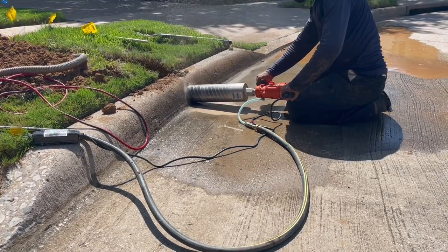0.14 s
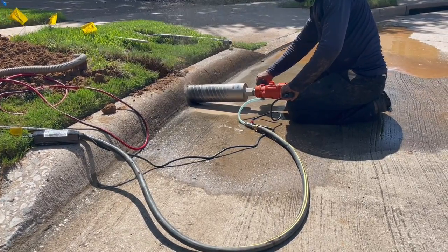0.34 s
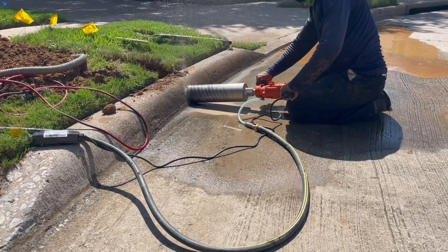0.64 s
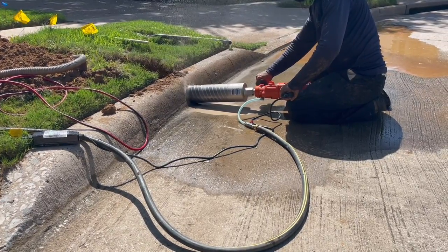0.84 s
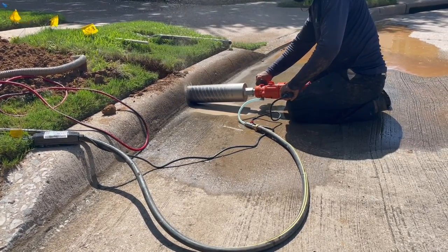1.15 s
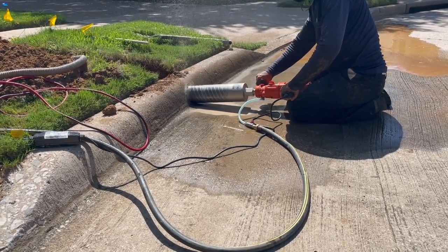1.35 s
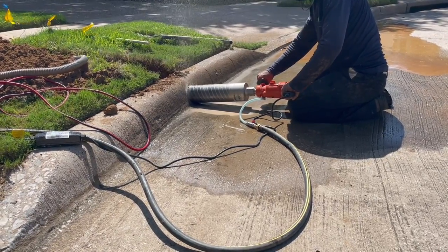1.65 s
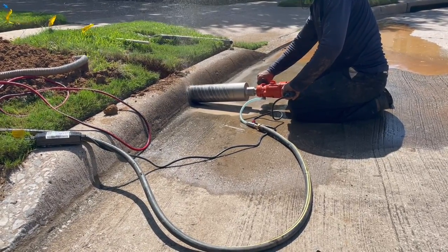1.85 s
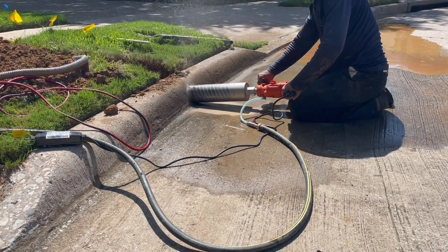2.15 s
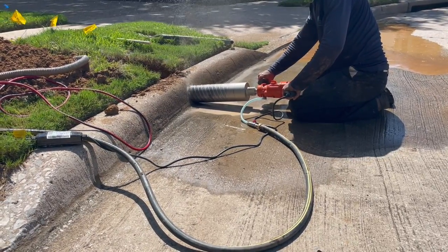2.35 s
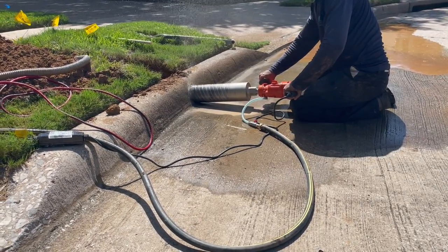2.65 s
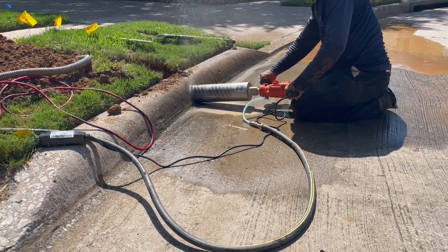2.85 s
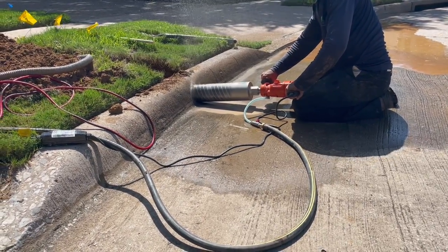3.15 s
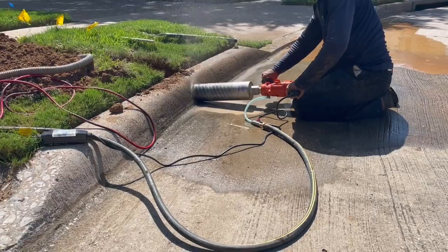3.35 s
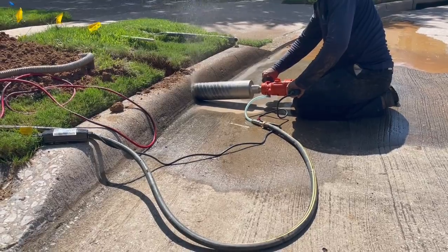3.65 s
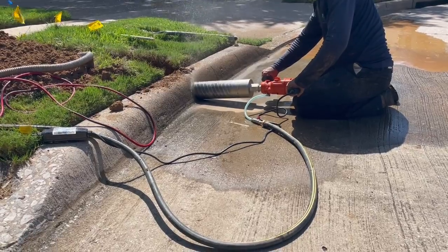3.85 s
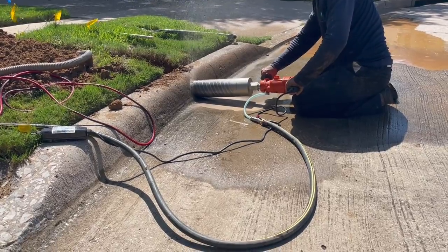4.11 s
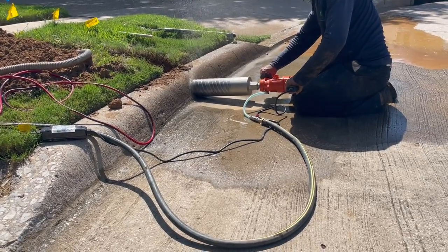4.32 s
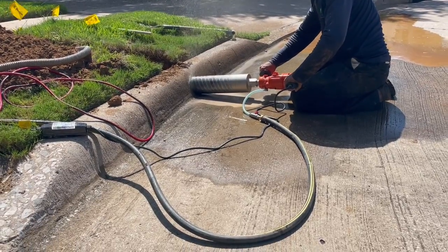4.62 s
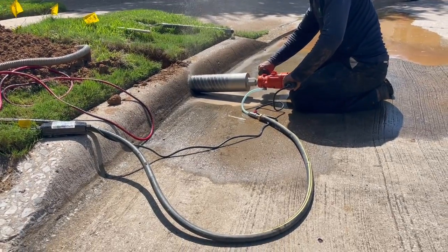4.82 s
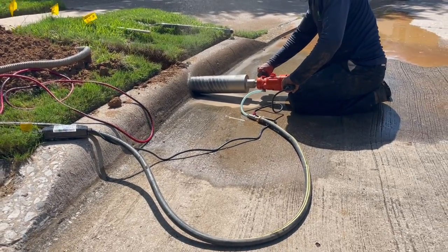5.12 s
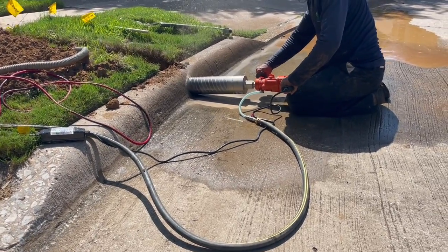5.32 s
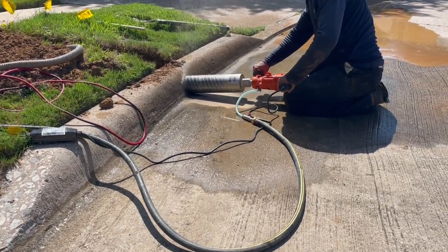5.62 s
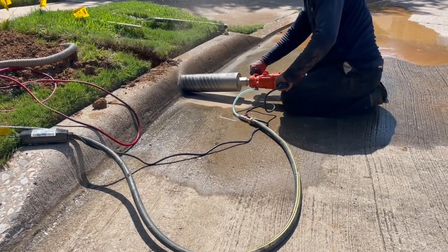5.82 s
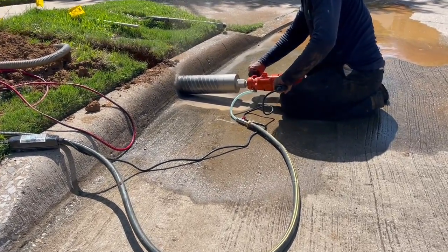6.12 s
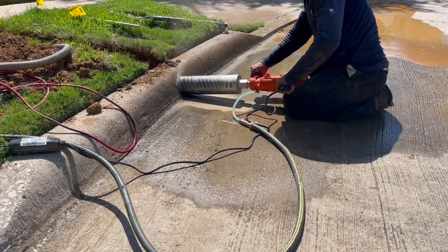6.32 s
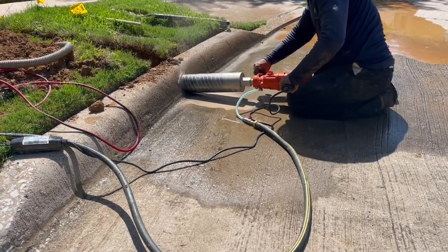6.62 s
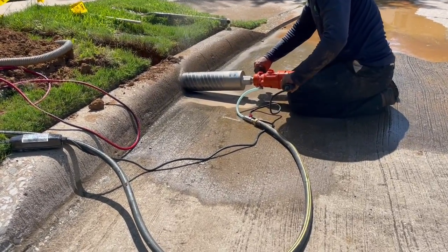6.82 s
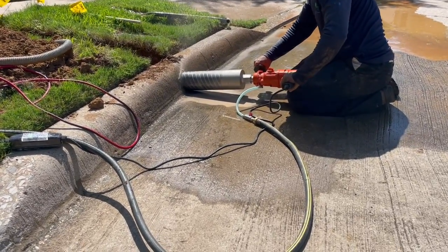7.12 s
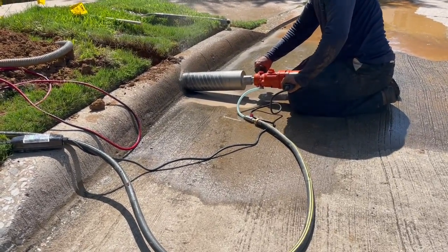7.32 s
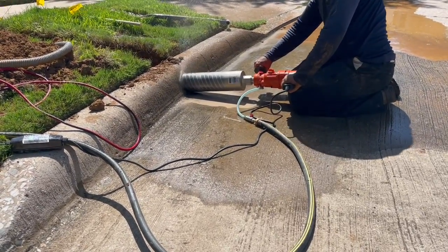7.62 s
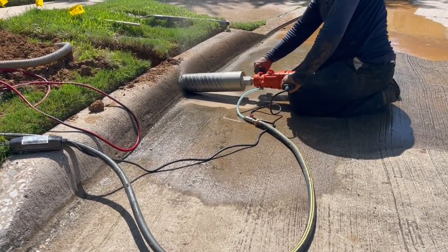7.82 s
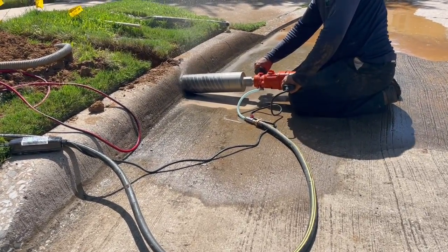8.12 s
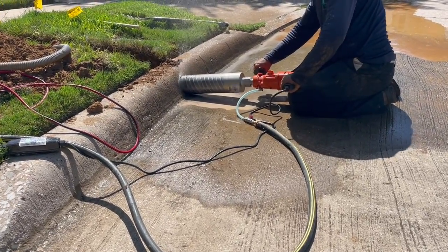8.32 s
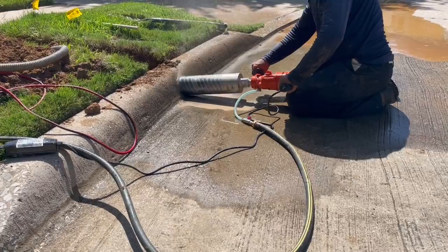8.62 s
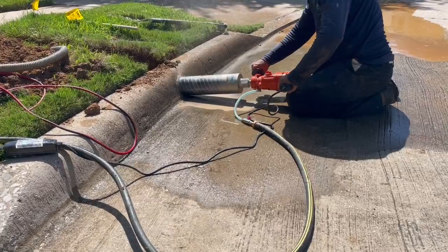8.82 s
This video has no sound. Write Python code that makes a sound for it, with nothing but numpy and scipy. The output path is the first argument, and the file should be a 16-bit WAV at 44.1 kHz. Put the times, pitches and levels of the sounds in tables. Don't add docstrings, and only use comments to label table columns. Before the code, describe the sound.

A kneeling worker's drill runs throughout beside a street, cutting a kerb. Noisy metallic scraping dominates, fluttering at a fast knocking rate, with a thin high gear whine and low ground shudder underneath. Small surges open the stretch, the middle is steadier, then the cut becomes harder, brighter and more uneven with brief crunchy catches. Dry open air, fairly near stereo microphones, slight wind rumble.

```python
import sys
import numpy as np
from scipy import signal
from scipy.fft import rfft, irfft
from scipy.io import wavfile
from scipy.ndimage import uniform_filter1d, map_coordinates

SR = 44100
rng = np.random.default_rng(int(sys.argv[2]) if len(sys.argv) > 2 else 0)


def voltage_ratio(level):
    return 10 ** (np.asarray(level, float) / 20)


def materialize(psi):
    bounded = np.clip(np.atleast_2d(psi).T, -1, 1)
    quanta = np.round(bounded * 32767).astype(np.int16)
    wavfile.write(sys.argv[1], SR, quanta)


N = 395136

# pitch_hz, width_hz, light_bite_db,
# hard_bite_db, left_right_db
BARREL_MODES = [(2204, 90, -5, -4.5, 1.5), (2417, 59, -9.5, -7.5, -7.5), (2598, 60, -11.5, -9, 1.5),
                (2944, 90, -0.5, 4, 1.5), (3090, 65, 4, 2, 0), (3380, 80, -1.5, 5, 4),
                (3510, 50, -1.5, 5.5, 5), (3670, 60, -4, .1, 6), (3908, 55, 0, -5, 2),
                (4476, 75, -7.5, -5, 8.5), (4674, 77, 1.5, 0, 4), (4864, 110, -6.5, -0.5, -1),
                (5064, 81, -4, -7, 6), (5465, 71, 1.5, -4, 1.5),
                (5740, 82, -8, -1.8, 8.5), (5645, 70, -3, -5, 3), (5870, 70, -8, -8, -3),
               (6030, 70, -6, -3, -1), (6205, 80, -2.5, -3, -2), (6355, 120, -4, -1, 0),
               (6486, 164, -4.5, -2.9, -7), (7090, 200, -9, -7, -5), (7740, 220, -6, -5, 0),
               (8040, 220, -7, -3, 0), (8900, 200, -10, -9, 0), (9710, 260, -12, -10, -1),
               (10180, 130, -15, -13, -18.5)]
# pitch_hz, width_hz, light_bite_db, hard_bite_db, left_right_db
HOUSING_MODES = [(798, 200, -3, -8.5, 1.5), (941, 250, -3, 0, 1.5), (1357, 148, 1.5, 3.5, -0.5),
                 (1582, 140, -2, 0, 0.72), (1796, 120, 3, 4.5, -0.16), (2007, 200, 0, -5.5, 1.4)]
# pitch_hz, width_hz, light_bite_db, hard_bite_db, left_right_db
KERB_MODES = [(176.6, 55, -6, -5, 0), (260, 110, -5.5, -5, 0.33), (432, 84, -5.5, -7, .5),
              (607.5, 110, -0.5, 0, 1)]
# pitch_hz, level_db, left_right_db
SCRAPE_TONE = [(2000, -40, 0), (2745, -30, 0), (3250, -10, 3), (4200, -13.5, 5), (5250, -12, 4),
               (5800, -11.5, 0), (6900, -10, 1), (8400, -10.5, 0), (9600, -24, 0), (11000, -40, 0)]
# pitch_hz, level_db, left_right_db
THUD_TONE = [(310, -28, 0), (710, -11.5, 0.65), (1130, -16, 0.74), (2200, -8.5, 0.28), (2740, -35, 0),
             (3960, -63, 0)]
# pitch_hz, level_db, left_right_db
HISS_TONE = [(5000, -40, 0), (8500, -3, 0), (9650, -4, 0), (10500, 0, 0), (11900, -5, 0), (12400, -3, 0),
             (14000, -6.5, 0), (14900, -2.5, 0), (16000, -2.5, 0)]
# pitch_hz, level_db, left_right_db
SHUDDER_TONE = [(30, -34, 0), (110, -19, 0), (190, -11, 0), (330, -12.5, 0), (700, -18, 1), (1100, -29, 0),
                (3000, -60, 0)]
# pitch_hz, right_lead_radians, likeness_0_to_1
PORTS = [(100, 0.12, 0.99), (1690, 0.27, 0.99), (2350, 0, .95), (2550, -.5, .72), (2760, -1.3, .45),
         (2950, -2.6, .88), (3500, -2.5, .7), (3750, -5.8, .35), (3900, -7, .72), (4150, -5.8, .3),
         (4500, -6.3, .72), (4800, -7, .86), (5250, -7.8, .32), (5400, -8, .5), (5520, -9.8, .25),
         (5670, -11.1, .65), (5850, -12, .55), (6200, -12.2, .9),
         (6700, -12.2, .75), (7100, -11.5, .3), (7500, -9.9, .9), (8100, -9.42, .99),
              (8800, -8.9, .93), (9700, -7.8, .65), (10500, -6.9, .93), (11500, -6.28, .99),
              (12600, -5.7, .93), (13300, -4.9, .6), (14100, -3.8, .93), (15500, -3.14, .99)]
# start_s, peak_db
STONE_JOLTS = [(0.148, -28), (0.177, -19.5), (0.531, -26), (0.857, -35), (1.864, -38), (2.612, -29),
               (3.652, -18), (3.823, -19), (5.543, -21), (5.669, -38), (5.893, -19), (5.919, -18),
               (6.124, -24), (6.418, -17), (6.525, -16), (6.551, -8), (6.606, -18), (6.695, -18),
               (7.094, -21), (8.197, -33), (7.788, -24), (8.169, -15), (8.606, -15), (8.686, -20.5)]
# pitch_hz, level_db_per_hz
WIND_RUMBLE = [(15, -35), (25, -28), (54, -3), (140, -7), (180, -25), (310, -120)]
# cycles_per_turn, slow_db, fast_db, surge_share
TURN_TONES = [(5, -54, -57, .9), (6, -58, -52, .8), (7, -66, -59, 1.1), (16, -64, -49, .1),
              (20, -54, -80, 1.9), (21, -59, -74, 1.7), (23, -68, -47, -.6)]
# pitch_hz, stronger_over_step_db, weaker_emptied_below_db
PAIR_ROUNDING = [(300, 24, -34), (800, 22, -30), (1200, 16, -17), (2000, 7, -13), (2500, 7, -16),
                 (2750, 5, -7), (3000, 7, -15), (4100, 7, -11), (4600, 8, -20), (6000, 9, -18),
                 (6700, 8, -11), (7500, 8, -6.5), (10000, 7.5, -5.5), (14000, 5, -4)]
# time_s, first_mesh_hz
MOTOR_SPEED = [(.32, 2299), (.7, 2388), (1.3, 2396), (2.1, 2520), (2.62, 2468), (3.55, 2578), (4.64, 2524),
               (5.17, 2436), (5.76, 2648), (5.92, 2608), (6.4, 2706), (6.6, 2668), (6.92, 2794),
               (7.2, 2746), (7.55, 2803), (8.0, 2740), (8.48, 2737), (8.85, 2650)]
# pitch_hz, level_db
GEARBOX_TONE = [(2300, -48.5), (2392, -43.5), (2470, -45.5), (2515, -49.5), (2565, -54), (2620, -48),
                (2700, -48), (2770, -56)]
# time_s, feed_pressure_db
FEED_PRESSURE = [(0, -0.1), (.57, -0.2), (1.6, 0), (1.97, 0.57), (2.7, 0), (3.8, 0.5), (5.39, -0.7),
                 (5.85, -0.5), (6.3, -1), (6.52, -0.4), (6.8, -1.5), (7.06, -0.7), (7.31, -1), (7.76, 0),
                 (8.14, 1.05), (8.33, 0.45), (8.68, 1), (8.96, 0.5)]
# middle_s, strength_db, length_s
GRIND_SURGES = [(0.232, 6, 0.18), (0.437, 5, 0.11), (3.66, 3.5, 0.12), (3.834, 6, 0.064),
                (5.897, 5.5, 0.22), (6.12, 5.5, 0.18), (6.426, 5, 0.11), (6.546, 3, 0.2),
                (7.058, 4.5, 0.19), (7.395, 4, 0.065), (7.707, 3, 0.18), (8.216, 6, 0.049),
                (8.706, 6, 0.042)]
# middle_s, peak_db, length_s
WIND_GUSTS = [(0.078, -45, 0.18), (0.497, -52, .3), (0.89, -49, 0.42), (1.557, -48, 0.22),
              (1.894, -52, 0.38), (2.416, -51, 0.14), (2.75, -65, 0.23), (3.576, -50, 0.21),
              (3.916, -52, 0.082), (4.6, -49, 0.069), (4.848, -52, 0.4), (5.4, -52, 0.12), (5.8, -57, .4),
              (6.8, -63, 0.25), (7.342, -46, 0.16), (8.398, -70, 0.99)]
# level_db, feed_share, hard_bite_gain_db, surge_share
RING, HOUSING = (-31.5, 1.8, 0.3, 0.19), (-36.5, 0.66, -0.53, 0.58)
SPRAY, GROUND = (-38, 2.1, 4, 0.09), (-42, 1.2, 1.2, 0.86)

RIPPLE_HZ = 120
TEETH, SECOND_TEETH = 74.5, 27
SLOW_HZ, FAST_HZ = 2300, 2740
SECOND_DB, SECOND_BITE_DB = -51, 4.5
BITE_S, BITE_RISE_S, LIGHT, HARD = 5.4, 0.34, 0.033, 0.94
EASE_S, EASE = 7.6, .25
LEAN_DB = 1.38
CALM_DB = -59.5
CONTROL_STEP = 49
TIME_S = np.arange(N) / SR
HZ = np.fft.rfftfreq(4096, 1 / SR)
SIDES = np.array([[.5], [-.5]])


def unit(x):
    return x / np.sqrt(np.mean(x ** 2) + 1e-20)


def along(points, hz):
    f, *cols = np.transpose(points)
    return [np.interp(np.log(hz + 1), np.log(f + 1), c) for c in cols]


def curves(rows):
    s, *cols = np.transpose(rows)
    return [np.interp(TIME_S, s, c) for c in cols]


def wobble(rate):
    knots = rng.standard_normal(int(N * rate / SR) + 4)
    return map_coordinates(knots, [np.arange(N) * rate / SR])


def swells(rows):
    s, _, length = np.transpose(rows)[..., None]
    return np.exp(-(2 * (np.arange(0, N, CONTROL_STEP) / SR - s) / np.abs(length)) ** 2)


def spread(x):
    return np.interp(np.arange(N), np.arange(0, N, CONTROL_STEP), x)


def filtered(x, response):
    size = 2 * (response.shape[-1] - 1)
    kernel = np.roll(irfft(response), size // 2, axis=-1)
    return signal.oaconvolve(x, kernel, axes=-1)[..., size // 2:][..., :N]


def causal(power):
    cepstrum = irfft(np.log(power + 1e-12) / 2)
    half = cepstrum.shape[-1] // 2
    cepstrum[..., 1:half] *= 2
    cepstrum[..., half + 1:] = 0
    return np.exp(rfft(cepstrum))


def heard(force, between, modes=(), hard=False):
    db, lean_db = along(between, HZ)
    power = voltage_ratio(db + SIDES * lean_db) ** 2
    for hz, width, light_db, hard_db, lean_db in modes:
        peak = (HZ * width) ** 2 / ((hz ** 2 - HZ ** 2) ** 2 + (HZ * width) ** 2)
        mode_db = hard_db if hard else light_db
        power = power + voltage_ratio(mode_db + SIDES * lean_db) ** 2 * peak ** 1.32
    lead, alike = along(PORTS, HZ)
    turn = np.arccos(np.clip(alike, 0, 1)) / 2
    balance = np.sqrt(power / power.mean(0))
    colour = causal(power.mean(0)) * balance * np.exp(-1j * SIDES * lead)
    shared = filtered(force[:1], colour * np.cos(turn))
    own = filtered(force[1:], colour * np.sin(turn) * 2 * SIDES)
    return shared + own


def mesh_hz():
    return uniform_filter1d(curves(MOTOR_SPEED)[0], size=SR // 6)


def barrel_turns():
    return np.cumsum(mesh_hz()) / SR / TEETH


def biting():
    def step(s):
        return .5 + .5 * np.tanh(2 * (TIME_S - s) / BITE_RISE_S)

    return np.clip(LIGHT + (HARD - LIGHT) * step(BITE_S) - EASE * step(EASE_S), 0, 1)


def surging():
    return spread(np.transpose(GRIND_SURGES)[1] @ swells(GRIND_SURGES))


def loudness(part):
    return np.array(part) @ [np.ones(N), curves(FEED_PRESSURE)[0], biting(), surging()]


def bursts(times, db, t60):
    blows = np.bincount(np.clip(times * SR, 0, N - 1).astype(int), voltage_ratio(db), N)
    return signal.lfilter([1], [1, -voltage_ratio(-60 / (t60 * SR))], blows)


def knocks(turns, scatter_db, jitter_s):
    beat = np.arange(int(2 * turns[-1]))
    draw = rng.standard_normal((len(beat), 2))
    times = np.interp(beat / 2, turns, TIME_S) + jitter_s * draw[:, 0]
    return unit(bursts(times, scatter_db * draw[:, 1], t60=0.02))


def contact_pressure():
    once_a_turn = np.cos(2 * np.pi * barrel_turns())
    return voltage_ratio(0.36 * wobble(15) + 0.67 * wobble(60) + 1.5 * once_a_turn)


def grit_force(pressure, ripple_db, blow_db, own_db):
    bite = biting()
    ripple = np.cos(2 * np.pi * RIPPLE_HZ * TIME_S) * (1 - .7 * bite)
    blow_level = voltage_ratio(-11.5 + 3.5 * bite + 0.16 * surging() + blow_db)
    blows = blow_level * knocks(barrel_turns(), scatter_db=1.5, jitter_s=.0012)
    grinding = unit(pressure * voltage_ratio(ripple_db * ripple + own_db * wobble(40)))
    return rng.standard_normal((2, N)) * (grinding + blows)


def through(drive, between, modes):
    bite = biting()
    light = heard(np.sqrt(1 - bite) * drive, between, modes)
    other_drive = drive[::-1] * 2 * SIDES
    return light + heard(np.sqrt(bite) * other_drive, between, modes, hard=True)


def stone_jolts():
    s, db = np.transpose(STONE_JOLTS)
    return voltage_ratio(17.5) * bursts(s, db, t60=0.048) * rng.standard_normal((2, N))


def barrel(pressure):
    force = grit_force(pressure, ripple_db=1.04, blow_db=0.037, own_db=0.29)
    ring = unit(through(force, SCRAPE_TONE, BARREL_MODES))
    return voltage_ratio(loudness(RING) + 4.5 + LEAN_DB * SIDES) * ring


def housing(pressure, jolt):
    force = grit_force(pressure, ripple_db=0.8, blow_db=0.054, own_db=0.18) + jolt
    return voltage_ratio(loudness(HOUSING) + 0.37) * unit(through(force, THUD_TONE, HOUSING_MODES))


def kerb(pressure, jolt):
    force = grit_force(pressure, ripple_db=0.54, blow_db=0.28, own_db=1.03) + voltage_ratio(9.0) * jolt
    return voltage_ratio(loudness(GROUND) - 1.3) * unit(heard(force, SHUDDER_TONE, KERB_MODES))


def spray(pressure):
    force = grit_force(pressure, ripple_db=1.9, blow_db=-1.9, own_db=1.0)
    return voltage_ratio(loudness(SPRAY) + 3.5) * unit(heard(force, HISS_TONE))


def drill():
    pressure, jolt = contact_pressure(), stone_jolts()
    return barrel(pressure) + housing(pressure, jolt) + kerb(pressure, jolt) + spray(pressure)


def turn_tones(mesh):
    surge_db = surging()
    fast = np.clip((mesh_hz() - SLOW_HZ) / (FAST_HZ - SLOW_HZ), 0, 1) ** 1.5
    total = 0
    for cycles, slow_db, fast_db, share in TURN_TONES:
        level_db = slow_db + (fast_db - slow_db) * fast + share * surge_db + 2.8 * wobble(16)
        phase = mesh * round(cycles) / TEETH + cycles / 45 * wobble(30)
        total = total + voltage_ratio(level_db) * np.sin(phase)
    return total


def gears():
    first_db = along(GEARBOX_TONE, mesh_hz())[0]
    second_db = SECOND_DB + SECOND_BITE_DB * biting()
    ripple = 2 * np.pi * RIPPLE_HZ * TIME_S
    mesh = 2 * np.pi * np.cumsum(mesh_hz() + 3 * wobble(30)) / SR
    first_phase = mesh + 0.48 * np.sin(ripple) + 0.86 * SIDES
    first = voltage_ratio(first_db + 4.0 + 1.9 * wobble(16)) * np.sin(first_phase)
    second_phase = mesh * SECOND_TEETH / TEETH + 0.49 * wobble(30)
    second = voltage_ratio(second_db + 2.0 + 2.4 * wobble(18)) * np.sin(second_phase)
    hum = voltage_ratio(-56.0 + 0.67 * wobble(1.6)) * np.sin(ripple)
    return first + second + turn_tones(mesh) + hum


def wind():
    common, own = filtered(rng.standard_normal((2, N)), voltage_ratio(along(WIND_RUMBLE, HZ)[0])[None])
    lumps = voltage_ratio(1.5 * wobble(15))
    strength = voltage_ratio(CALM_DB) + spread(voltage_ratio(np.transpose(WIND_GUSTS)[1]) @ swells(WIND_GUSTS))
    difference = .7 * SIDES * own * voltage_ratio(2 * wobble(2.96))
    return strength * unit(lumps * (common + difference))


def scene():
    return drill() + gears() + wind()


def joint_stereo(x, shift=1114, size=1024, band=16):
    count = (N + shift) // size + 1
    padding = ((0, 0), (shift, (count + 1) * size - N - shift))
    pair = np.pad([x[0] + x[1], x[0] - x[1]], padding) / 2
    n, k = np.arange(2 * size)[:, None], np.arange(size)
    window = signal.windows.kaiser_bessel_derived(2 * size, 4 * np.pi)[:, None]
    waves = np.cos(np.pi / size * (n + .5 + size / 2) * (k + .5))
    basis = window * waves * np.sqrt(2 / size)
    halves = pair.reshape(2, -1, size)
    frames = np.concatenate([halves[:, :-1], halves[:, 1:]], axis=2)
    lines = (frames @ basis).reshape(2, count, -1, band)
    level = np.sqrt(np.mean(lines ** 2, axis=3, keepdims=True)) + 1e-9
    fine_db, empty_db = along(PAIR_ROUNDING, k[band // 2::band, None] * SR / (2 * size))
    supply = rng.standard_normal((2,) + level[0].shape)
    step = level.max(0) * voltage_ratio(2 * supply[0] - fine_db)
    kept = level > level[::-1] * voltage_ratio(empty_db + 1.8 * supply[1])
    rounded = np.sign(lines) * np.floor(np.abs(lines) / step + .4) * step * kept
    frames = rounded.reshape(2, count, size) @ basis.T
    first_half = np.pad(frames[..., :size], ((0, 0), (0, 1), (0, 0)))
    second_half = np.pad(frames[..., size:], ((0, 0), (1, 0), (0, 0)))
    mid, side = (first_half + second_half).reshape(2, -1)[:, shift:shift + N]
    return np.array([mid + side, mid - side])


def top_cut(x):
    return signal.sosfilt(signal.butter(12, 15750, fs=SR, output="sos"), x)


def record(dry):
    mix = joint_stereo(dry)
    return top_cut(mix)


dry = scene()
out = record(dry)
materialize(out)
```